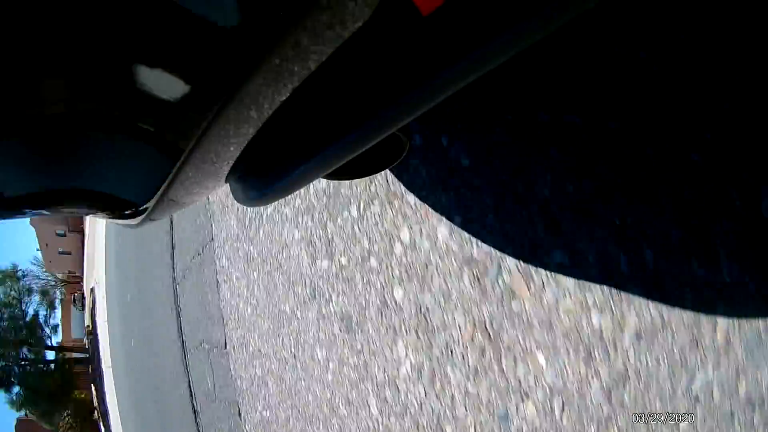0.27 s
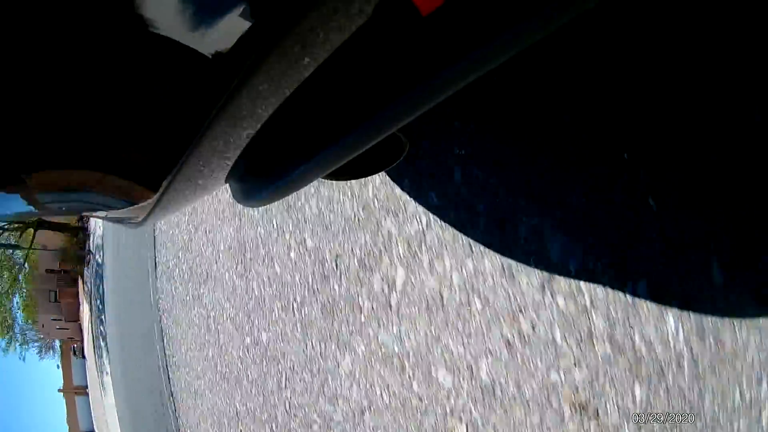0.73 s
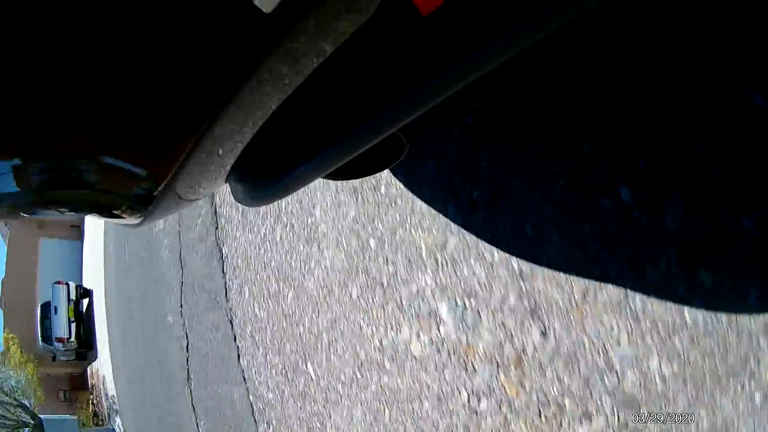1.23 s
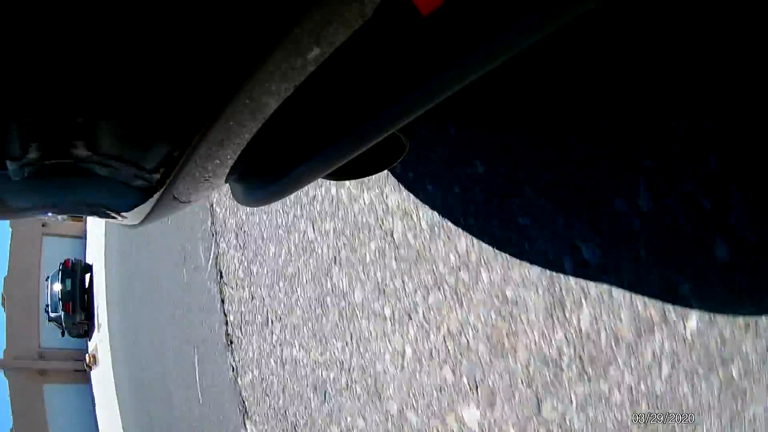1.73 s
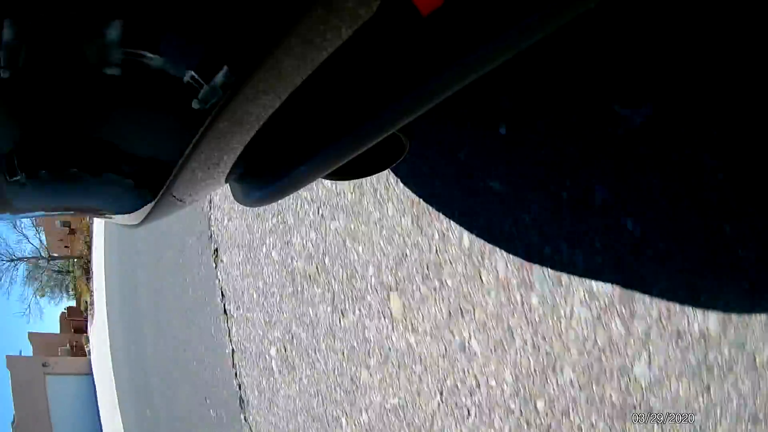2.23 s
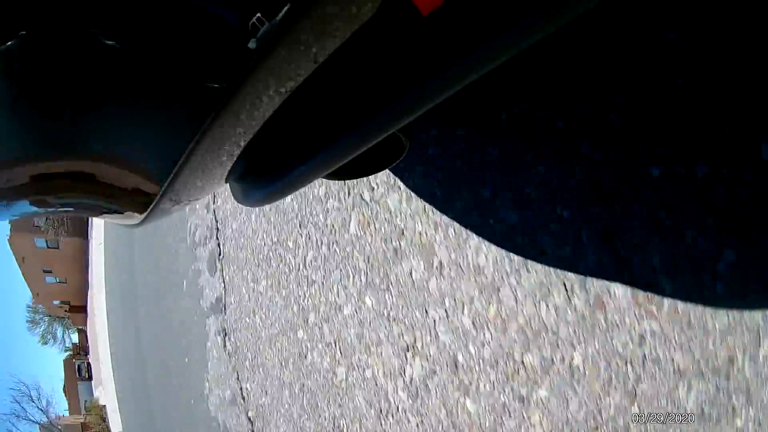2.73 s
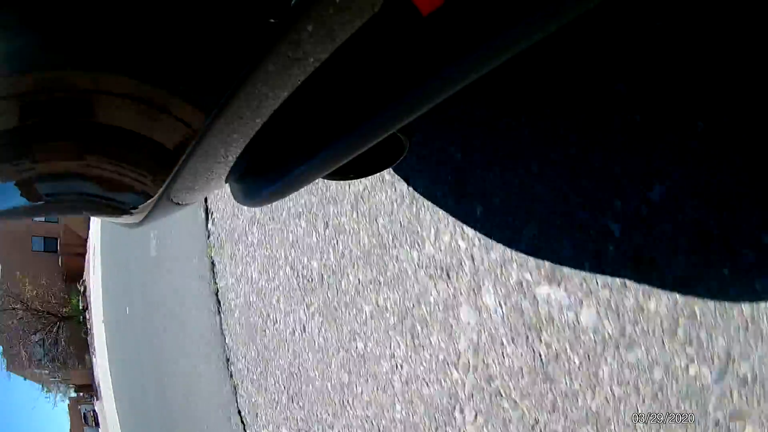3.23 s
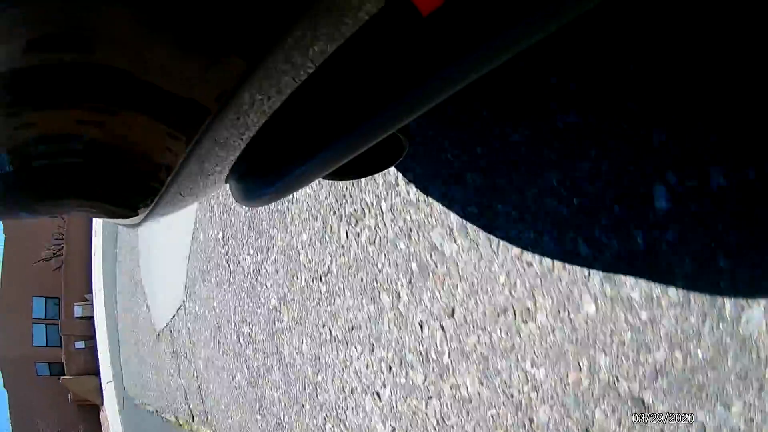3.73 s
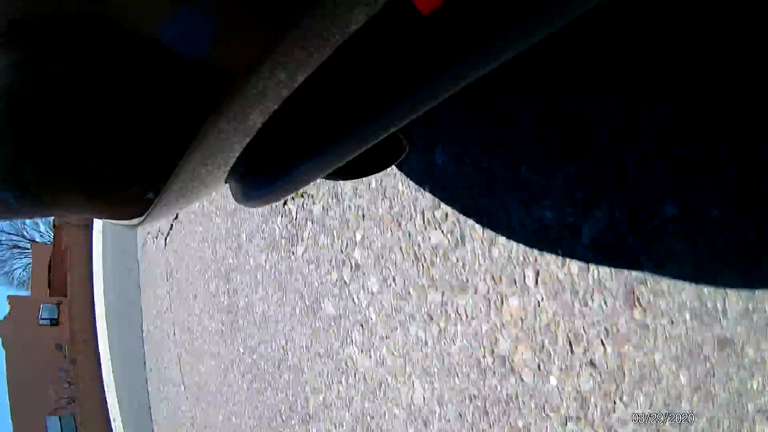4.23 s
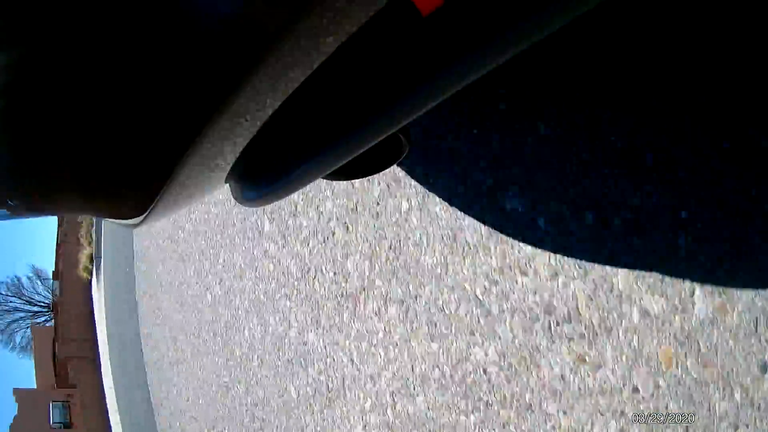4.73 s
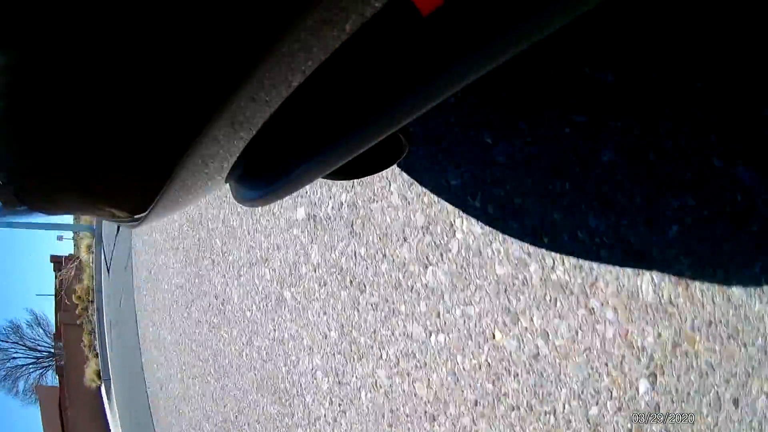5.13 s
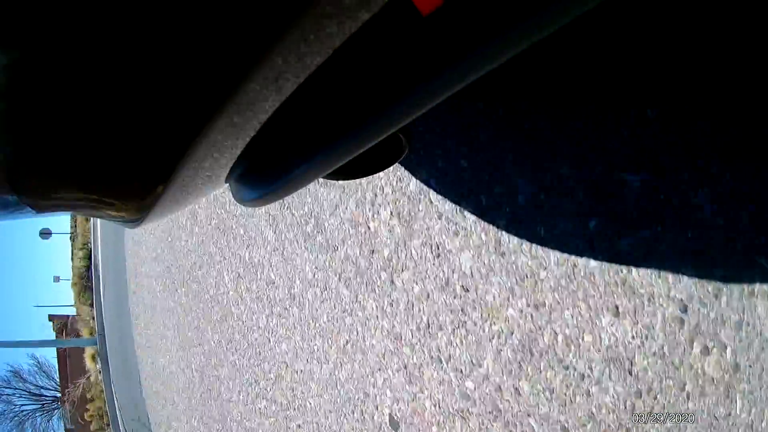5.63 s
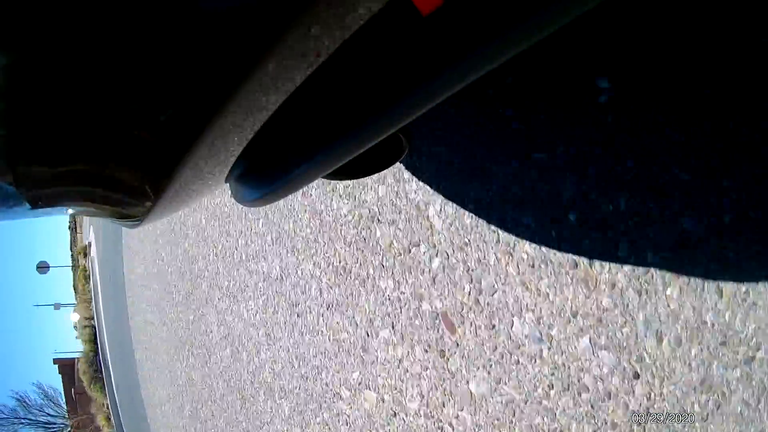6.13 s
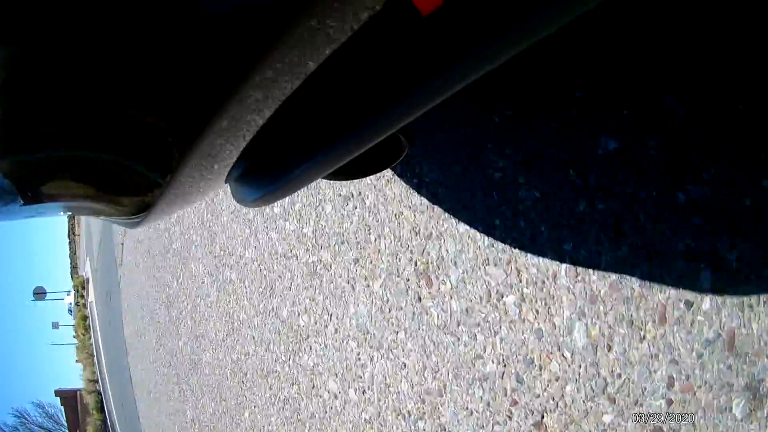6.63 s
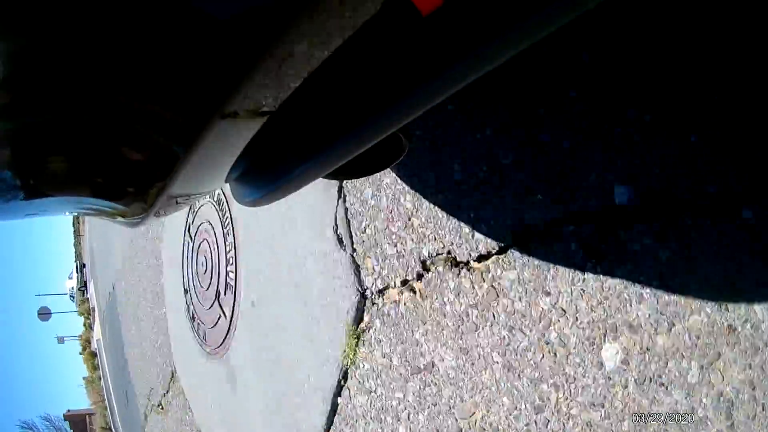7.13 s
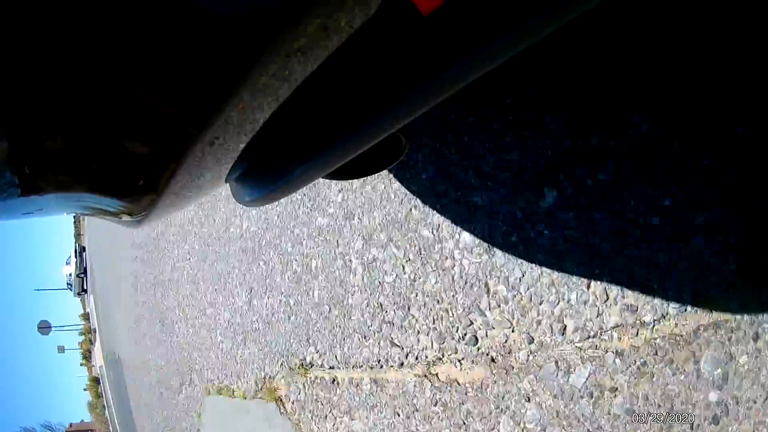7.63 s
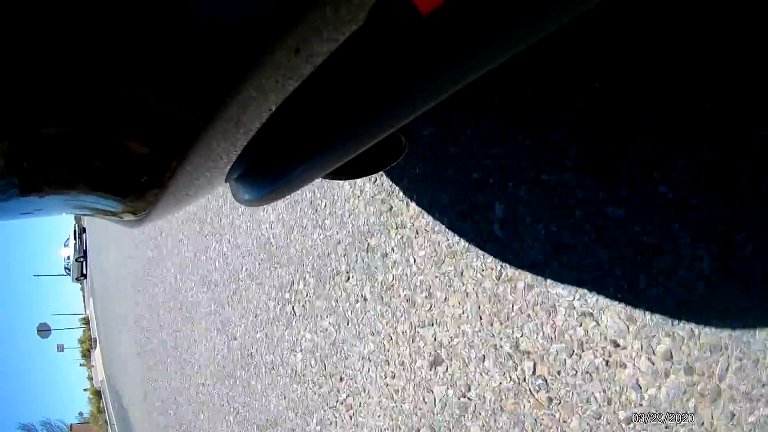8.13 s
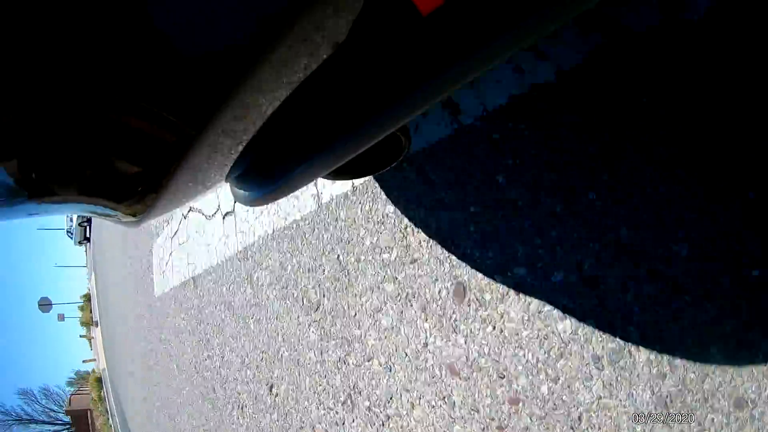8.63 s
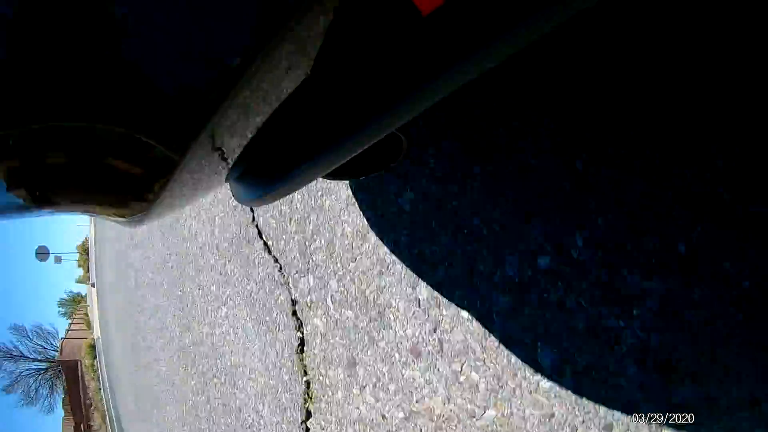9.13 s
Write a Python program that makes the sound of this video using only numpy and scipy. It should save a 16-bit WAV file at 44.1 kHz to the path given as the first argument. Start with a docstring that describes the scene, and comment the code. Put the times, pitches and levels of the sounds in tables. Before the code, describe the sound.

Close beside a tailpipe, an engine note sinks over rushing tyre roar, chugs near idle, then bursts into a harsh, overloaded, rising bark.

```python
"""A four-cylinder turbo car with an open exhaust, heard close beside its tailpipe, over tyre roar, rumble and hiss.
It coasts down with the throttle shut, chugs along near idle, then pulls hard and overloads the input.
The note is a sum of engine orders, each swelling as it glides through a pipe resonance; the chug is filtered impulses.
Gas noise bursts with each firing under load, and in bouts the firings ring the modes of a loose tailpipe.
Tyre roar is filtered noise that fades with the road speed."""
import sys
import numpy as np
from scipy import signal
from scipy.fft import rfft, irfft
from scipy.io import wavfile
from scipy.ndimage import uniform_filter1d

SR = 44100
rng = np.random.default_rng(int(sys.argv[2]) if len(sys.argv) > 2 else 0)


def put_to_file(sound):
    """Save the sound as 16-bit audio at rate SR, in the file named by the first command-line argument."""
    columns = np.atleast_2d(sound).T  # one column per channel
    safe = np.clip(columns, -1, 1)
    whole_steps = np.round(safe * 32767)
    wavfile.write(sys.argv[1], SR, whole_steps.astype(np.int16))


N = 414099
T = np.arange(N) / SR  # s

# engine speed: (time [s], firing rate [Hz])
FIRING_RATE = [(0.0, 77.9), (0.53, 76.17), (1.4, 70.35), (2.01, 65.94), (2.55, 61.92), (2.86, 58.64),
               (3.81, 49.14), (4.16, 45.61), (4.85, 38.9), (5.23, 35.34), (5.61, 32.16), (6.06, 28.25),
               (6.26, 26.39), (6.65, 28.56), (7.16, 24.89), (7.34, 25.93), (7.53, 30.04), (7.85, 30.83),
               (7.99, 33.7), (8.16, 51.97), (8.24, 54.54), (8.7, 54.62), (8.88, 56.69), (9.13, 66.36),
               (9.39, 78.03)]
# exhaust resonances that lift each order: (centre [Hz], half-width [Hz], lift [dB])
PIPE_RESONANCES = [(135, 11, 4), (184.4, 8, 8), (226, 5.3, 10), (281, 10, 11), (331.6, 12, 9),
                   (389, 3.3, 7), (500, 11, 10.5), (554, 23, 9)]
# pressure waves on the light overrun: (frequency [Hz], order level [dB])
OVERRUN_ORDERS = [(62, -16), (77, -14), (130, -25.5), (160, -21), (190, -21), (220, -21.5), (232, -33),
                  (340, -36.5), (600, -51)]
# pressure waves in the burble, before its sag: (frequency [Hz], order level [dB])
BURBLE_ORDERS = [(40, -15), (58, -7.5), (112, -11.5), (135, -18.5), (170, -33.5), (235, -31.5), (340, -33),
                 (480, -45)]
# pressure waves under load, at LOAD_HZ: (frequency [Hz], order level [dB])
LOADED_ORDERS = [(37, -27.5), (55, -12), (75, -10), (110, -8), (140, -11), (165, -13.5), (205, -16),
                 (222, -26.5), (290, -24.5)]
# tyre roar spectrum: (frequency [Hz], relative level [dB])
TYRE_SPECTRUM = [(150, 2), (350, 2.5), (470, -1.5), (680, -2.5), (1000, -3), (1350, 0), (1680, -6),
                 (1850, -14), (2450, -18), (2850, -33), (4200, -37.5), (8000, -66.5)]
# low rumble spectrum: (frequency [Hz], relative level [dB])
RUMBLE_SPECTRUM = [(15, -18), (35, 1.5), (70, -0.5), (130, 2), (200, 3), (300, -4.5), (450, -33.5),
                   (1000, -67.5)]
# high hiss spectrum: (frequency [Hz], relative level [dB])
HISS_SPECTRUM = [(2500, -16.5), (4000, 1), (5200, -9), (8000, -30.5)]
# gusts of low rumble: (start [s], end [s], level [dB])
RUMBLE_GUSTS = [(.3, 1.2, -23), (2.5, 2.8, -25), (4.7, 5.15, -26.5), (8.0, 9.39, -25.5)]
# spells of sharp-edged pulses: (start [s], end [s], level [dB])
EDGE_SPELLS = [(.8, 2.03, -20.5), (2.7, 4.7, -29), (8.0, 9.39, -29.5)]
# pulse front spectrum: (frequency [Hz], relative level [dB])
EDGE_SPECTRUM = [(200, -39), (290, 8.5), (350, 2), (450, -16.5), (560, -0.5), (750, -13), (1100, -21.5),
                 (4000, -83.5)]
# stray late burns: (time [s], level [dB])
LATE_BURNS = [(1.502, -2), (1.53, -5), (1.779, 1), (2.048, 0.5), (4.919, -3.5), (5.078, -11), (5.93, -11.5)]
# bouts of tailpipe rattle: (start [s], end [s], level at the start [dB])
RATTLE_BOUTS = [(2.6, 4.15, -26), (4.2, 4.95, -28), (6.35, 7.9, -37), (8.0, 9.39, -17.5)]
# sharp knocks at the tailpipe: (time [s], level [dB])
TAILPIPE_KNOCKS = [(3.603, -9.5), (4.202, -9.5), (4.545, -15), (7.584, -18.5)]
# tailpipe modes: (frequency [Hz], t60 [s], relative level [dB])
TAILPIPE_MODES = [(619.54, 0.051, 4), (708, 0.059, -0.5), (774, 0.03, 1.5), (914, 0.032, 4),
                  (970, .025, -12), (1260, 0.007, -12)]
# thump spectrum without fuel: (frequency [Hz], relative level [dB])
PUMPING_SPECTRUM = [(30, -6), (65, 1), (100, 0), (135, 7.5), (175, 4.5), (240, -8), (290, -9), (360, -21.5),
                    (450, -38), (900, -83)]
# thump spectrum with fuel: (frequency [Hz], relative level [dB])
FIRED_SPECTRUM = [(18, -40), (30, -7), (48, 3.5), (125, 9), (192, 2), (253, -45.5), (285, -1), (308, -27.5),
                  (344, -19.5), (420, -56.5), (550, -99), (920, -120)]
# gas and shock spectrum under load: (frequency [Hz], relative level [dB])
GAS_SPECTRUM = [(200, -33), (470, 0.5), (750, -5.5), (1050, -6), (1350, -12), (1800, -20), (2500, -33.5),
                (6000, -78)]

# the drive: overrun fills out to a burble, breaks into thumps, fuel returns, throttle opens
BURBLE_S, THUMPS_S, FUEL_S, THROTTLE_S = 2.55, 4.77, 6.15, 7.99
BURBLE_RISE_S, THUMPS_RISE_S, FUEL_RISE_S, THROTTLE_RISE_S = 0.27, 0.2, 0.078, 0.05
BURBLE_SAG_DB_PER_S = 4.5
# the overrun hardens for a while: the fundamental thins and the upper orders grow
HARD_FROM_S, HARD_TO_S, HARD_THIN_DB, HARD_GROW_DB = 0.84, 2.03, -6, 3
# tyre roar follows a power of a steadily falling relative speed
ROAR_DB, SLOWING_PER_S, ROAR_POWER = -17.5, 0.098, 2.27
# thumps: levels at IDLE_HZ, growing with firing rate
IDLE_HZ, PUMPING_DB, FIRED_DB, THUMP_DB_PER_HZ = 27.63, -27.5, -16, 0.97
# waves and gas bark under load: levels at LOAD_HZ, growing with firing rate
LOAD_HZ, WAVE_DB_PER_HZ, BARK_DB, BARK_DB_PER_HZ = 52.81, 0.5548, -20, 0.38
# under load hot gas raises the pipe resonances and pulses crest later
HOT_RATIO, CREST_LAG_S = 1.045, 0.003297
TOP_HZ = 15600  # upper band edge of the output


def undb(db):
    """Decibels to gain."""
    return 10 ** (np.asarray(db) / 20)


def curves(rows):
    """Each column of a table, joined by straight lines in time."""
    times_s, *columns = np.transpose(rows)
    return [np.interp(T, times_s, column) for column in columns]


def fade(start_s, end_s):
    """Linear rise from 0 to 1 between two moments."""
    return np.clip((T - start_s) / max(end_s - start_s, 1 / SR), 0, 1)


def spell(start_s, end_s, attack_s, release_s):
    """Attack, hold and release; the release starts at end_s."""
    return fade(start_s, start_s + attack_s) * (1 - fade(end_s, end_s + release_s))


def bouts(rows, attack_s, release_s, sag_db_per_s=0):
    """Summed gain of (start [s], end [s], level [dB]) spells, each sagging from its start."""
    gain = 0
    for start_s, end_s, db in rows:
        level = undb(db - sag_db_per_s * (T - start_s))
        gain = gain + spell(start_s, end_s, attack_s, release_s) * level
    return gain


def unit(x):
    """Scaled to a standard deviation of 1."""
    return x / np.std(x)


def noise():
    """White noise, rms 1."""
    return rng.standard_normal(N)


def walk(rate_hz):
    """Slow random wander with a spread of 1: noise smoothed twice over 1 / rate_hz."""
    width = int(SR / rate_hz)
    once = uniform_filter1d(noise(), width, mode="wrap")
    return unit(uniform_filter1d(once, width, mode="wrap"))


def ring(x, response):
    """x played through an impulse response."""
    return signal.fftconvolve(x, response)[:N]


def colour(x, points, size=8192):
    """Minimum-phase filter with the given (frequency [Hz], level [dB]) spectrum."""
    points_hz, db = np.transpose(points)
    freqs_hz = np.maximum(np.arange(size // 2 + 1) * SR / size, 1)
    gain = undb(np.interp(np.log(freqs_hz), np.log(points_hz), db))
    # folding the cepstrum makes the response causal
    cepstrum = irfft(np.log(gain))
    cepstrum[1:size // 2] *= 2
    cepstrum[size // 2 + 1:] = 0
    return ring(x, irfft(np.exp(rfft(cepstrum))))


def butter(x, cutoff_hz, kind, order=2):
    """Butterworth low-pass or high-pass."""
    sos = signal.butter(order, min(cutoff_hz, SR / 2 - 1), kind, fs=SR, output="sos")
    return signal.sosfilt(sos, x)


def blows(rows):
    """One impulse for each (time [s], level [dB]) row."""
    out = np.zeros(N)
    for time_s, db in rows:
        out[int(time_s * SR)] += undb(db)
    return out


def strength(turns, scatter_db, limp_db):
    """Gain of the nearest firing: random scatter, with strong and weak ones alternating limp_db apart."""
    firing = np.round(turns).astype(int)
    scatter = scatter_db * rng.standard_normal(size=1024)[firing]
    return undb(scatter + limp_db * (firing % 2 - 1.5))


def pulses(turns, hz):
    """An impulse at each firing, of equal mean power at every engine speed."""
    return np.diff(np.floor(turns), prepend=0) / np.sqrt(hz)


def orders(hz, spectrum, count, heat=1):
    """Level [dB] of each multiple of the firing rate: pulse spectrum plus pipe resonance lifts."""
    freqs_hz = np.arange(1, 1000)
    points_hz, db = np.transpose(spectrum)
    response_db = np.interp(np.log(freqs_hz), np.log(points_hz), db)
    for centre_hz, width_hz, lift_db in PIPE_RESONANCES:
        offset = (freqs_hz - heat * centre_hz) / width_hz
        response_db = response_db + lift_db * np.exp(-0.5 * offset ** 2)
    return [np.interp(k * hz, freqs_hz, response_db) for k in range(1, count + 1)]


def drone(levels_db, turns, skew_rad, scatter_db, limp_db):
    """Pressure waves merging into a note: harmonics of the firing rate share a phase that shapes the wave."""
    wave = 0
    for k, db in enumerate(levels_db, 1):
        wave = wave + undb(db) * np.cos(2 * np.pi * k * turns + skew_rad)
    firing_gain = uniform_filter1d(strength(turns, scatter_db, limp_db), size=200)
    return np.sqrt(2) * wave * firing_gain


def coast(turns, hz):
    """Throttle shut: a light overrun note hardens for a while, then fills out to a deep, fading burble."""
    hard = spell(HARD_FROM_S, HARD_TO_S, attack_s=0.5, release_s=0.08)
    first, *upper = orders(hz, OVERRUN_ORDERS, count=8)
    light_db = np.array([first + HARD_THIN_DB * hard] + [db + HARD_GROW_DB * hard for db in upper])
    sag_db = BURBLE_SAG_DB_PER_S * (T - BURBLE_S - BURBLE_RISE_S)
    deep_db = np.array(orders(hz, BURBLE_ORDERS, count=8)) - sag_db
    levels_db = light_db + fade(BURBLE_S, BURBLE_S + BURBLE_RISE_S) * (deep_db - light_db)
    return drone(levels_db, turns, skew_rad=-2.3, scatter_db=1.32, limp_db=-0.04)


def road(turns, hiss_db=-73, rumble_db=-29):
    """Noise: tyre roar falling with speed and stirred by the exhaust stream, gusty rumble, faint high hiss."""
    speed = np.maximum(1 - SLOWING_PER_S * np.minimum(T, THROTTLE_S), 0)  # held once the throttle opens
    stir_db = 0.71 * walk(40) + 0.45 * np.cos(2 * np.pi * turns)
    roar = unit(colour(noise() * undb(stir_db), TYRE_SPECTRUM)) * undb(ROAR_DB) * speed ** ROAR_POWER
    gusts = undb(rumble_db) + bouts(RUMBLE_GUSTS, attack_s=0.17, release_s=0.25)
    rumble = unit(colour(noise(), RUMBLE_SPECTRUM)) * gusts * undb(2 * walk(8.8))
    hiss = unit(colour(noise(), HISS_SPECTRUM)) * undb(hiss_db)
    return roar + rumble + hiss


def edge(turns, hz, dull_hz=400):
    """The front of each pulse adds a buzz above the drone; it rounds off as the engine slows."""
    fronts = pulses(turns, hz) * strength(turns, scatter_db=2.0, limp_db=-6.0)
    buzz = colour(fronts, EDGE_SPECTRUM)
    steep = np.clip((hz - 52) / 14, 0, 1)  # dull below 52 Hz, full above 66 Hz
    rounded = signal.sosfiltfilt(signal.butter(4, dull_hz, fs=SR, output="sos"), buzz)
    mixed = unit(rounded + steep * (buzz - rounded))
    return mixed * bouts(EDGE_SPELLS, attack_s=0.62, release_s=0.075)


def thuds(ring_hz=160, length_s=0.003):
    """A late burn swells and rings in the pipe for a cycle or two."""
    t = T[:SR // 10]
    swell = t / length_s * np.exp(1 - t / length_s)
    return ring(blows(LATE_BURNS), -np.sin(2 * np.pi * ring_hz * t) * swell)


def tailpipe(turns, hz, clack_hz=1300, clack_decay_s=0.0012):
    """Each pulse jolts the loose tailpipe and favours different modes; a few sharp knocks ring it too."""
    t = T[:SR // 10]
    modes = []
    for mode_hz, t60_s, db in TAILPIPE_MODES:
        decay = np.exp(-np.log(1000) * t / t60_s)
        modes.append(undb(db) * np.sin(2 * np.pi * mode_hz * t) * decay)
    jolts = pulses(turns, hz) * strength(turns, scatter_db=2.6, limp_db=2.5)
    ringing = unit(sum(ring(jolts * rng.uniform(-0.73, 1, N), mode) for mode in modes))
    rattle = ringing * bouts(RATTLE_BOUTS, attack_s=0.12, release_s=0.21, sag_db_per_s=2.0)
    clack = np.sin(2 * np.pi * clack_hz * t) * np.exp(-t / clack_decay_s) + 0.2 * sum(modes)
    return butter(rattle + ring(blows(TAILPIPE_KNOCKS), clack), 1500, "low", order=6)


def chug(turns, hz, lead_s=0.00515, echo_s=0.0158, echo_gain=0.22):
    """Separate thumps near idle: hollow pumping, fuller once fuel returns; each echoes down the pipe."""
    beat = pulses(turns + lead_s * hz, hz)  # early, as the thump needs a moment to crest
    fuel = fade(FUEL_S, FUEL_S + FUEL_RISE_S)
    pumping = unit(colour(beat * strength(turns, scatter_db=1.6, limp_db=0.5), PUMPING_SPECTRUM))
    fired = unit(colour(beat * strength(turns, scatter_db=0.4, limp_db=0.3), FIRED_SPECTRUM))
    thumps = -(1 - fuel) * pumping * undb(PUMPING_DB) - fuel * fired * undb(FIRED_DB)
    echoed = thumps + echo_gain * np.interp(T - echo_s, T, thumps)
    # the engine eases just before the pull
    eased_db = -4.5 * spell(7.66, 7.87, attack_s=0.19, release_s=0.14)
    return echoed * undb(THUMP_DB_PER_HZ * (hz - IDLE_HZ) + eased_db)


def pull(turns, hz):
    """Throttle open: strong pressure waves that swell as the engine speeds up."""
    levels_db = orders(hz, LOADED_ORDERS, count=4, heat=HOT_RATIO)
    waves = drone(levels_db, turns, skew_rad=0.36, scatter_db=0.36, limp_db=1.8)
    return waves * undb(WAVE_DB_PER_HZ * (hz - LOAD_HZ))


def rasp(turns, hz, lead_s=0.00139, burst_s=0.0016, between=0.18, shock_db=-5, spit_db=-14, build_s=0.14):
    """Under load each firing tears out a shock front and a burst of turbulent gas, every other one harder."""
    front = turns + lead_s * hz
    from_front_s = ((front + 0.5) % 1 - 0.5) / hz
    size = strength(turns, scatter_db=2.5, limp_db=2.0)
    burst = between + size * np.exp(-0.5 * (from_front_s / burst_s) ** 2)
    gas = unit(colour(noise() * burst, GAS_SPECTRUM))
    shock = unit(colour(pulses(front, hz) * size, GAS_SPECTRUM))
    # the jet spits brighter as the flow rises with engine speed
    spit_band = butter(butter(noise() * burst, 1000, "high"), 2100, "low")
    spit = unit(spit_band) * (hz / hz[-1]) ** 5.88
    bark_db = BARK_DB + BARK_DB_PER_HZ * np.maximum(hz - LOAD_HZ, 0)
    mixed = gas + undb(shock_db) * shock + undb(spit_db) * spit
    return mixed * undb(bark_db) * fade(THROTTLE_S, THROTTLE_S + build_s)


def turbo(whine_hz=4000, width_hz=500, whine_db=-63, spool_s=0.13):
    """The turbo's thin, airy whine under load: narrow-band noise at a steady pitch, fading in."""
    slow_noise = unit(butter(noise(), width_hz / 2, "low"))
    band = slow_noise * np.sqrt(2) * np.sin(2 * np.pi * whine_hz * T)
    return band * undb(whine_db) * fade(THROTTLE_S, THROTTLE_S + spool_s)


def scene():
    """One crankshaft times every exhaust sound; turns counts firings."""
    hz, = curves(FIRING_RATE)
    turns = np.cumsum(hz * (1 + 0.001 * walk(30))) / SR
    loaded_turns = turns - CREST_LAG_S * hz
    slow = fade(THUMPS_S, THUMPS_S + THUMPS_RISE_S)
    throttle = fade(THROTTLE_S, THROTTLE_S + THROTTLE_RISE_S)
    note = coast(turns, hz) * (1 - slow)
    note = note + chug(turns, hz) * slow * (1 - throttle)
    note = note + pull(loaded_turns, hz) * throttle
    exhaust = note + edge(turns, hz) + thuds() + rasp(loaded_turns, hz)
    return (exhaust + road(turns) + tailpipe(turns, hz) + turbo())[None]


def record(dry, ceiling=0.98, hiss_db=-77.0):
    """The input clips flat, its coupling capacitor tilts the flat tops, and the preamp hisses faintly."""
    clipped = butter(np.clip(dry, -ceiling, ceiling), 9, "high", order=1)
    sound = butter(clipped, 5000, "low", order=2) + undb(hiss_db) * noise()
    band_limit = signal.ellip(8, 0.2, 70, TOP_HZ, fs=SR, output="sos")
    return signal.sosfilt(band_limit, sound)


dry = scene()
out = record(dry)
put_to_file(out)
```